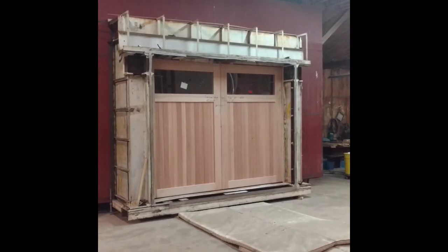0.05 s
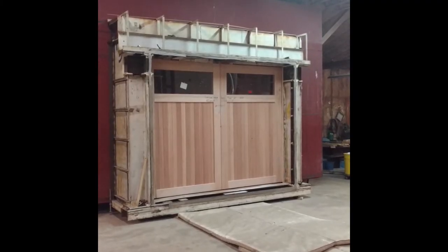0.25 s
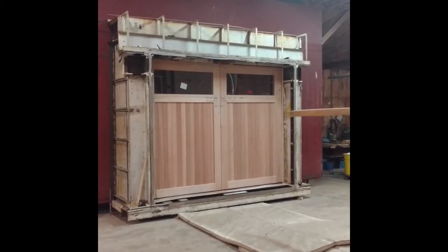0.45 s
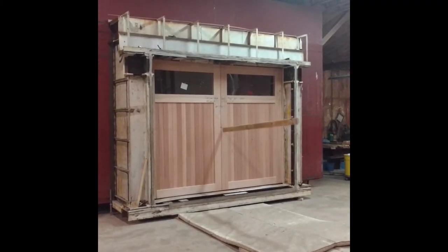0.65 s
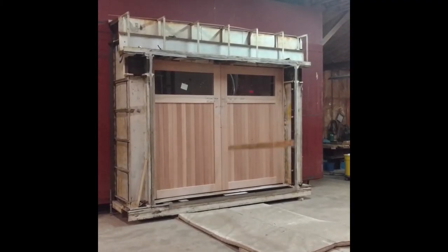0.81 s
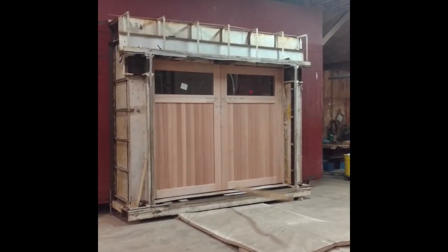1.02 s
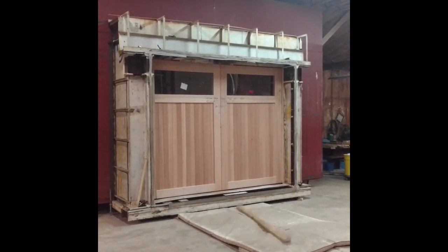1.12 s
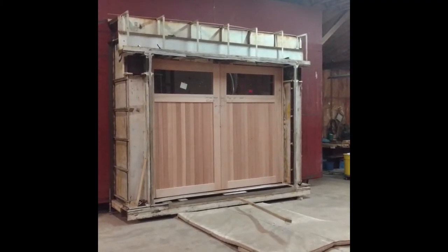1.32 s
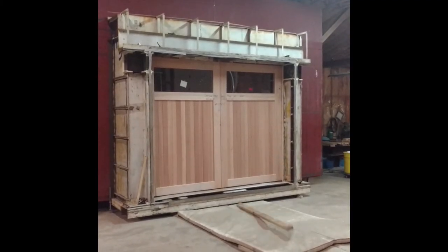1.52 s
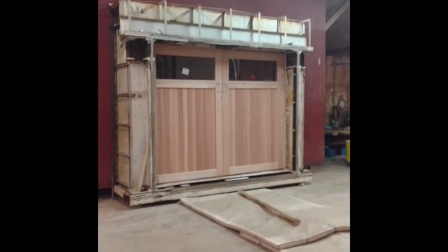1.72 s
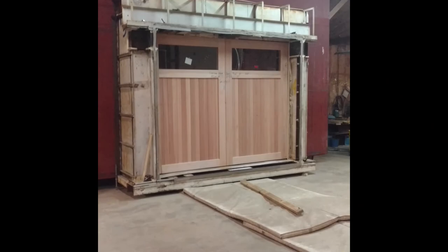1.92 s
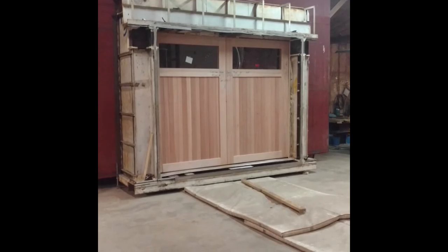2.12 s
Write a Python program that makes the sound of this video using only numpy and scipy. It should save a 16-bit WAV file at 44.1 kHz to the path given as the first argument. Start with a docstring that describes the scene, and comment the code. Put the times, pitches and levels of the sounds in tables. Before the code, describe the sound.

A plank slams into a wooden door in a large, echoing workshop. After faint low room noise, an air cannon's valve clacks at about 0.15 seconds. Air rushes through the barrel with short howls and chatter, then puffs and hisses around 0.45. The loud, slightly distorted bang comes at 0.6, the door rattling and ringing briefly. The plank clatters onto the floor at 1.1 and bounces more softly around 1.5-1.6.

```python
"""A large workshop, on a close pair of microphones widened by cross-feed, the hall ringing behind.
An air cannon fires a wooden plank at a wooden door. The valve clacks, air rushes down the barrel,
and the plank howls and chatters along it, then leaves the muzzle with a puff and a hissing jet.
It slams into the door, overloading the microphones, then falls and clatters on the floor."""
import sys
import numpy as np
from scipy import signal
from scipy.fft import rfft, irfft, next_fast_len
from scipy.io import wavfile

SR = 44100
rng = np.random.default_rng(int(sys.argv[2]) if len(sys.argv) > 2 else 0)


def master_out(mix):
    """Clip the mix to full scale and print it as 16-bit PCM to the path in sys.argv[1]."""
    frames = np.transpose(np.atleast_2d(mix))
    ceiling = np.clip(frames, -1, 1)
    pcm = np.round(ceiling * 32767).astype(np.int16)
    wavfile.write(sys.argv[1], SR, pcm)


N = 94815
T = np.arange(N) / SR
FFT_SIZE = next_fast_len(3 * N // 2, True)
HZ = np.maximum(np.arange(FFT_SIZE // 2 + 1) * SR / FFT_SIZE, 1)

# contacts of plank, door and frame: (time [s], relative level [dB], dull above [Hz])
SLAMS = [(.6152, 2.5, 4380), (.6215, 1.5, 1800), (.6275, 2.5, 2000), (.633, -0.5, 5035),
         (.6395, -3.5, 1108), (.646, -3, 1300), (.666, -15, 4000), (.675, -8.5, 1484), (.688, -8.5, 2980),
         (.707, -12, 900)]


def amp(db):
    """Decibels to gain."""
    return 10 ** (np.asarray(db) / 20)


def unit(x):
    """Scale to rms 1."""
    return x / np.sqrt(np.mean(x ** 2) + 1e-20)


def at_hz(points, hz):
    """Read a table on a log-frequency axis."""
    freqs, values = np.transpose(points)
    return np.interp(np.log(hz), np.log(freqs), values)


def level(points):
    """Gain along a curve of (time [s], level [dB])."""
    return amp(np.interp(T, *np.transpose(points)))


def decay(start, t60):
    """Jump to 1 at the start, then fall 60 dB every t60 seconds."""
    return (T >= start) * amp(-60 * np.maximum(T - start, 0) / t60)


def swell(peak_s, width_s):
    """A bell-shaped rise and fall around a moment."""
    return np.exp(-.5 * ((T - peak_s) / width_s) ** 2)


def colour(x, spectrum):
    """Causal (minimum-phase) filter with the given spectrum."""
    cepstrum = irfft(np.log(amp(at_hz(spectrum, HZ))), FFT_SIZE)[:FFT_SIZE // 2]
    cepstrum[1:] *= 2
    response = np.exp(rfft(cepstrum, FFT_SIZE))
    return irfft(rfft(x, FFT_SIZE) * response, FFT_SIZE)[..., :N]


def noise(spectrum):
    """Coloured noise, its own at each microphone; rms 1."""
    return unit(colour(rng.standard_normal((2, N)), spectrum))


def soft_pass(x, hz, kind):
    """First-order low- or high-pass."""
    return signal.lfilter(*signal.butter(1, hz, kind, fs=SR), x + 1e-18)


def resonance(x, hz, width_hz):
    """Two-pole resonance with gain 1 at its peak."""
    r = np.exp(-np.pi * width_hz / SR)
    feedback = [1, -2 * r * np.cos(2 * np.pi * hz / SR), r * r]
    return signal.lfilter(np.array([1, 0, -1]) * (1 - r * r) / 2, feedback, x)


def wood_resonance(x, hz, width_hz):
    """Two like resonances in series, for steeper flanks."""
    return resonance(resonance(x, hz, width_hz), hz, width_hz)


def contacts(rows, t60):
    """Each contact is a brief crunch and a click, dulled above its own frequency."""
    out = 0
    for start, db, dull_hz in rows:
        force = unit(rng.standard_normal((2, N)) * decay(start, t60)) / np.sqrt(N)
        force[:, int(start * SR)] += .25  # the click
        out = out + amp(db) * soft_pass(force, dull_hz, "low")
    return out


def room_tone():
    """Low workshop noise, ducked at the shot as by the recorder's gain control, slowly recovering."""
    # the duck and recovery: (time [s], level [dB])
    course = [(0, -29.5), (.16, -31), (.4, -89), (1.5, -56.5), (2.05, -48.5), (2.15, -47.5)]
    # the noise's colour: (frequency [Hz], relative level [dB])
    spectrum = [(25, -1.5), (60, -8.5), (200, 11), (330, 5), (700, -10.5), (2300, -23), (4000, -25.5),
                (8000, -47), (15000, -48)]
    return level(course) * noise(spectrum)


def hall(x):
    """The workshop's diffuse echo builds up quickly and dies band by band."""
    # reverberation time: (frequency [Hz], t60 [s])
    decay_times = [(100, 0.86), (270, 0.67), (700, 0.58), (2000, 0.72), (4500, 0.8), (9000, 0.55),
                   (14000, 0.26)]
    delay_s, build_s = .012, .0079
    white = rfft(rng.standard_normal((2, N)), FFT_SIZE)
    centres = np.geomspace(60, 15000, 10)
    tail = 0
    for hz, pick in zip(centres, np.eye(len(centres))):
        band_gain = np.interp(np.log(HZ), np.log(centres), pick)
        band = irfft(white * band_gain, FFT_SIZE)[:, :N]
        tail = tail + band * decay(delay_s, at_hz(decay_times, hz))
    tail = unit(tail * (1 - np.exp(-T / build_s))) / np.sqrt(N)
    return signal.fftconvolve(x, tail, axes=1)[:, :N]


def valve():
    """The firing valve snaps open with a short metallic ring and spits air."""
    # its clacks: (time [s], relative level [dB], dull above [Hz])
    hits = [(.161, -4.5, 3044), (0.1662, 5, 12130)]
    # the valve body's response: (frequency [Hz], gain [dB])
    body = [(60, -11), (300, 12), (900, -0.5), (1700, -3.5), (2400, -15), (4300, -1.5), (6000, -6),
            (15000, -10)]
    # air spitting past it: (frequency [Hz], relative level [dB])
    spit_spectrum = [(280, 1.5), (700, -10), (2500, -15), (4200, -0.5), (5500, -8), (9000, -3), (15000, -6)]
    force = contacts(hits, t60=.018)
    ring = resonance(force, hz=4150, width_hz=700)
    spit = amp(-30) * decay(start=.166, t60=.056) * noise(spit_spectrum)
    return amp(-1.5) * colour(force, body) + ring + spit


def barrel():
    """Rushing air rings the barrel."""
    # air flow through the barrel: (time [s], level [dB])
    flow = [(.16, -73.5), (.168, -45.5), (.207, -40), (.224, -21.5), (.25, -18), (.29, -20.5), (.35, -20.5),
            (.42, -21), (.59, -22), (.66, -42), (.75, -70.5)]
    # its turbulence: (frequency [Hz], relative level [dB])
    turbulence = [(40, -20.5), (130, -2), (270, 6), (400, 2.5), (600, 2), (1100, -6.5), (1800, -3.5),
                  (4300, -4.5), (8000, -10.5), (11000, -18), (15000, -32.5)]
    # the barrel's resonances: (frequency [Hz], width [Hz], gain [dB])
    modes = [(283, 27, 14.5), (567, 170, 2.5), (1043, 41, 9), (1683, 100, 3), (4345, 21, -8.5)]
    rush = level(flow) * noise(turbulence)
    return rush + sum(amp(db) * resonance(rush, hz, width) for hz, width, db in modes)


def howls():
    """The plank rubs along the barrel and sets it howling in short, wavering tones, dead centre."""
    # the tones: (peak time [s], width [s], pitch [Hz], level [dB])
    tones = [(.185, .014, 285, -22), (.25, .018, 1040, -31), (.243, .009, 4350, -29), (.277, .01, 285, -20),
             (.36, .016, 265, -18), (.362, .013, 1045, -22.5), (.378, .014, 1410, -27),
             (.401, .011, 1540, -19), (.418, .014, 782, -22), (.425, .014, 255, -13),
             (.462, .016, 921, -25.5), (.463, .004, 3420, -22)]
    waver_rms_hz, waver_cutoff_hz = 16, 44.6
    out = 0
    for peak_s, width_s, hz, db in tones:
        waver = unit(soft_pass(rng.standard_normal(N), waver_cutoff_hz, "low"))
        phase = 2 * np.pi * np.cumsum(hz + waver_rms_hz * waver) / SR
        out = out + amp(db) * swell(peak_s, width_s) * np.sin(phase)
    return np.array([out, out])


def chatter():
    """The plank chatters against the barrel in uneven slips, hardest just as it leaves."""
    slips_per_s = 170
    gaps, sizes = rng.uniform(.5, 1.5, (2, 1000))
    onsets = (np.cumsum(gaps) / slips_per_s * SR).astype(int)
    slips = np.zeros(N)
    slips[onsets[onsets < N]] = sizes[onsets < N]
    rasp = unit(wood_resonance(slips, hz=1150, width_hz=630))
    return amp(-22) * swell(peak_s=.402, width_s=.032) * rasp


def muzzle():
    """A low puff as the plank leaves, then a hissing jet that spurts and fades as the tank empties."""
    # colours of the puff and the jet: (frequency [Hz], relative level [dB])
    puff_spectrum = [(25, -36), (60, -33), (120, 1), (220, -3.5), (500, -16), (2000, -49.5)]
    jet_spectrum = [(150, -40), (700, 8), (1700, 4), (2400, -3.5), (3400, -1.5), (6000, -3.5), (9000, -8.5),
                    (12000, -18.5), (15000, -29)]
    # the free jet once the plank is out: (time [s], level [dB])
    jet_course = [(.42, -57.5), (.45, -23), (.464, -14), (.474, -18.5), (.52, -24.5), (.6, -24.5),
                  (.68, -31.5), (.9, -99)]
    puff = amp(-19.5) * decay(start=.37, t60=.2) * noise(puff_spectrum)
    return puff + level(jet_course) * noise(jet_spectrum)


def plank():
    """The plank lands on the floor, bounces and settles."""
    # its landings: (time [s], relative level [dB], dull above [Hz])
    landings = [(1.1225, -6.5, 1270), (1.1275, -8.5, 2400), (1.1365, 2.5, 640), (1.1395, -2.5, 3000),
                (1.1495, -4.5, 2480), (1.159, -10, 9500), (1.4915, -16, 800), (1.501, -16.5, 594),
                (1.566, -20.5, 1200), (1.580, -14.5, 990), (1.591, -11, 1000)]
    # the plank's response: (frequency [Hz], gain [dB])
    body = [(25, -27.5), (70, 4), (120, 14), (250, 17), (550, 6.5), (1300, 0), (4000, 0.5), (8500, -1),
            (15000, -12)]
    return amp(8) * colour(contacts(landings, t60=.067), body)


def clacks():
    """The plank's hard end meets the floor with short, bright clacks."""
    # its contacts: (time [s], relative level [dB], dull above [Hz])
    hits = [(1.139, 2, 3000), (1.5802, -8.5, 3020)]
    force = amp(-.5) * contacts(hits, t60=.005)
    return wood_resonance(force, hz=3700, width_hz=2000)


def panels():
    """The plank's first contact sets the door's panels ringing, alike at both microphones."""
    # the door's modes: (frequency [Hz], level [dB], t60 [s])
    modes = [(132, -21, .7), (178, -21, .8), (242, -7, .42), (426, -19, .35), (602, -20, .4),
             (701, -14.5, .25), (807, -22, .22), (872, -24, .3), (1172, -21, .16), (1400, -24, .16)]
    start = SLAMS[0][0]
    ring = 0
    for k, (hz, db, t60) in enumerate(modes):
        tone = (-1) ** k * np.sin(2 * np.pi * hz * (T - start))
        ring = ring + amp(db) * decay(start, t60) * tone
    return np.array([ring, ring])


def door():
    """The plank slams into the door, which bangs in its frame: a run of heavy contacts."""
    # the door's response: (frequency [Hz], gain [dB])
    body = [(25, -41.5), (65, -16.5), (110, 7.5), (250, 14.5), (400, 8), (700, 0), (1300, -6), (2200, -13),
            (4000, -15.5), (15000, -40)]
    return amp(29) * colour(contacts(SLAMS, t60=.04), body)


def scene():
    """Direct sound, the hall's echo and room tone."""
    # how strongly each source feeds the hall: (source, gain [dB])
    send_db = {"valve": 2, "air": -3.5, "howls": -3.5, "door": -4.5, "panels": -16.5, "plank": -2.5,
               "clacks": -20}
    sources = {"valve": valve(), "air": barrel() + chatter() + muzzle(), "howls": howls(),
               "door": door(), "panels": panels(), "plank": plank(), "clacks": clacks()}
    echo = hall(sum(amp(send_db[name]) * x for name, x in sources.items()))
    return sum(sources.values()) + echo + room_tone()


def cross_feed(x):
    """The feed across the pair: thinned in the bass and delayed by the microphones' spacing."""
    share, above_hz, delay_s = .88, 152, 17.1 / SR
    thinned = rfft(soft_pass(x, above_hz, "high"), FFT_SIZE)
    return share * irfft(thinned * np.exp(-2j * np.pi * HZ * delay_s), FFT_SIZE)[:N]


def record(dry):
    """A close pair, each with the other's delayed signal subtracted; peaks overload, the top is cut."""
    # how much of the difference between the microphones is kept: (frequency [Hz], gain [dB])
    side_gain = [(250, -18), (500, -23), (1000, -8.5), (2500, 0.5)]
    # left against right: (frequency [Hz], level [dB])
    balance = [(40, 5), (125, 1.5), (500, -2.3), (4000, -0.4), (8000, 0)]
    # left ahead of right, negative when it lags: (frequency [Hz], phase [rad])
    lead = [(40, -0.71), (110, -0.84), (250, -1), (500, 0.67), (1200, -0.41)]
    rumble_hz, top_hz, ceiling = 85, 15000, 1.05
    left, right = signal.sosfilt(signal.butter(2, rumble_hz, "high", fs=SR, output="sos"), dry)
    mid = (left + right) / 2
    side = colour((left - right) / 2, side_gain)
    mid, side = mid - cross_feed(mid), side + cross_feed(side)
    sign = np.array([[1], [-1]])  # left, right
    tilt = amp(sign * at_hz(balance, HZ) / 2) * np.exp(.5j * sign * at_hz(lead, HZ))
    pair = irfft(rfft(mid + sign * side, FFT_SIZE) * tilt, FFT_SIZE)[:, :N]
    clipped = pair / (1 + (pair / ceiling) ** 8) ** (1 / 8)
    return signal.sosfilt(signal.ellip(10, .2, 70, top_hz, fs=SR, output="sos"), clipped)


dry = scene()
out = record(dry)
master_out(out)
```